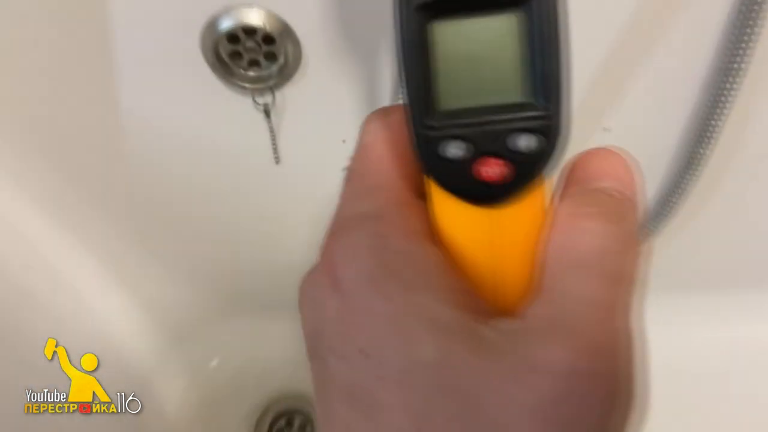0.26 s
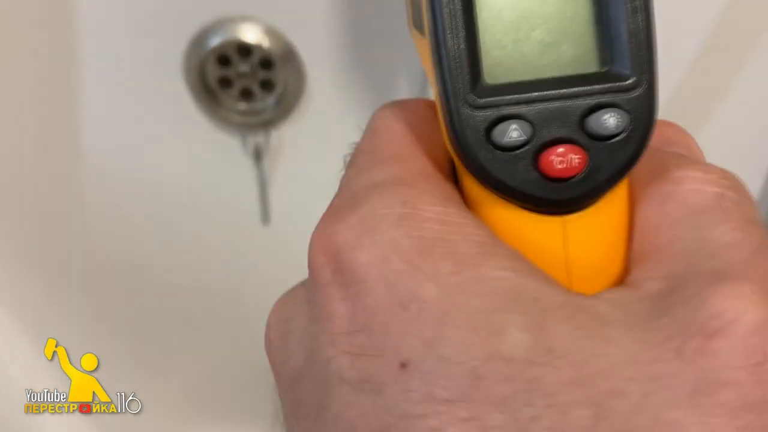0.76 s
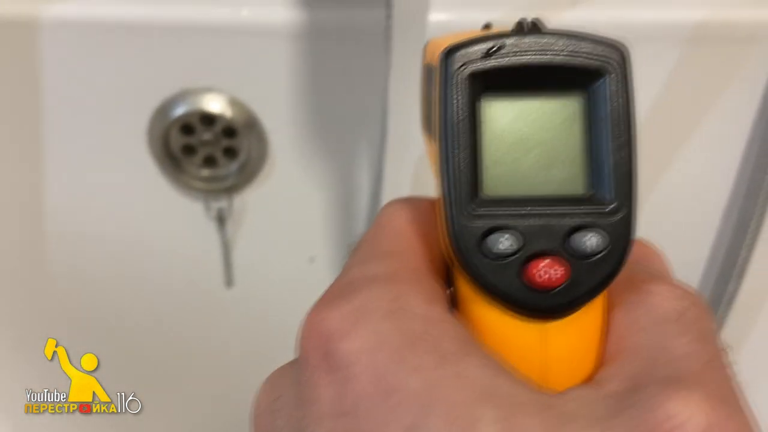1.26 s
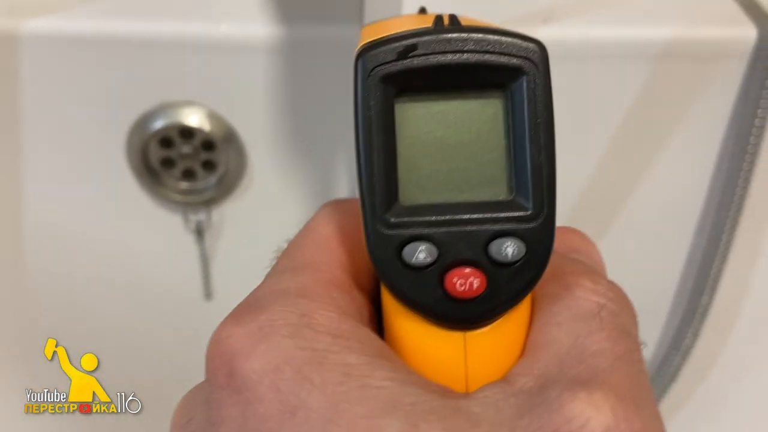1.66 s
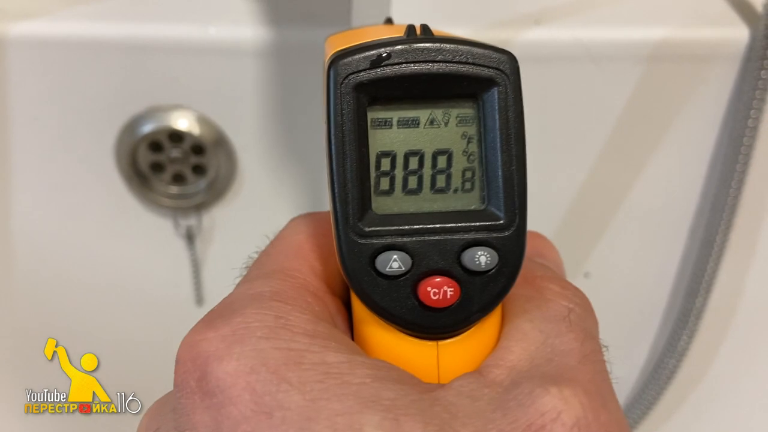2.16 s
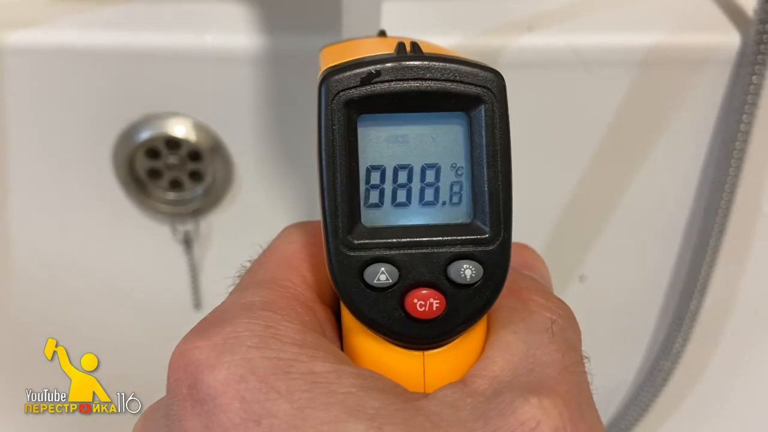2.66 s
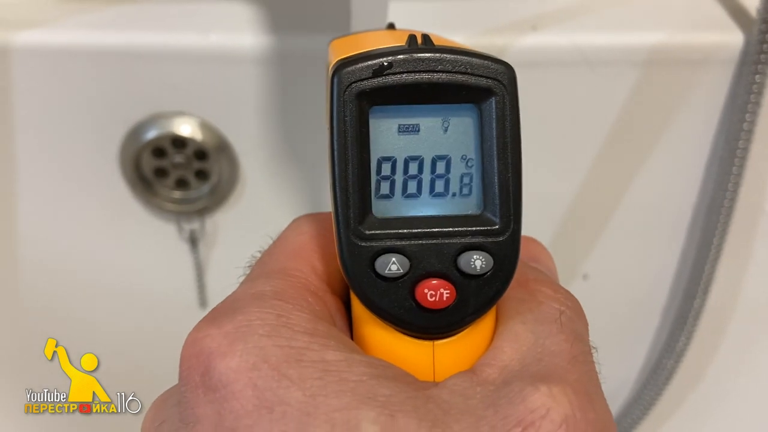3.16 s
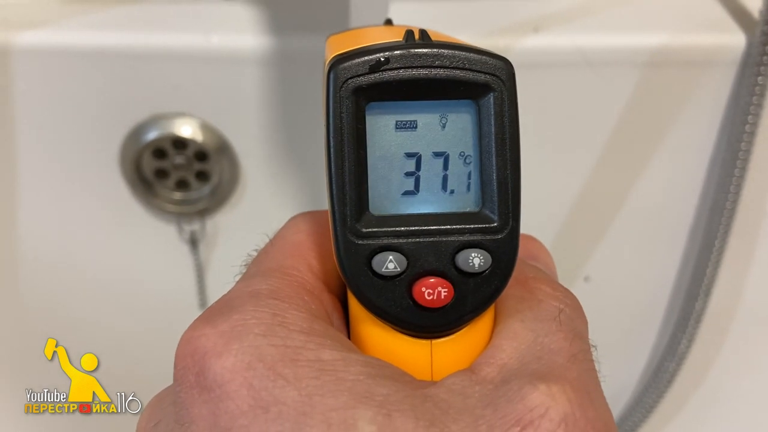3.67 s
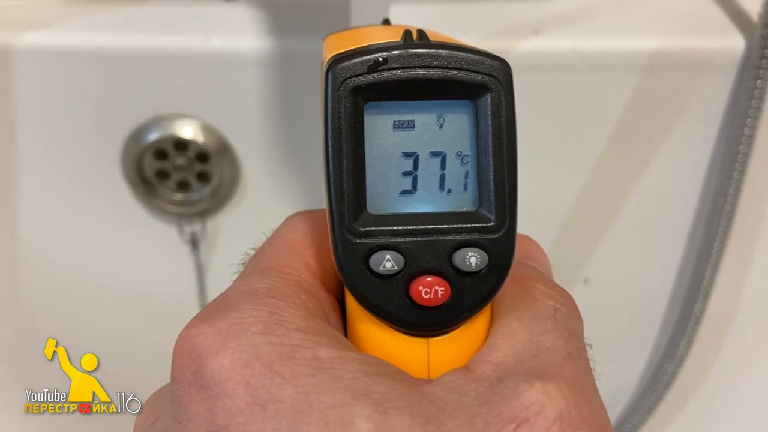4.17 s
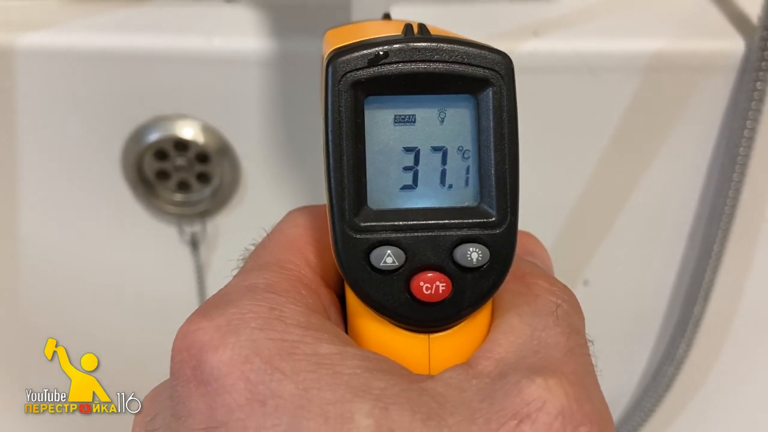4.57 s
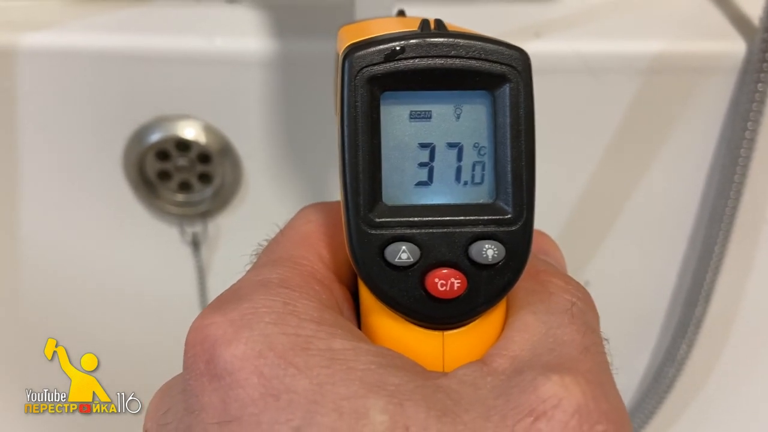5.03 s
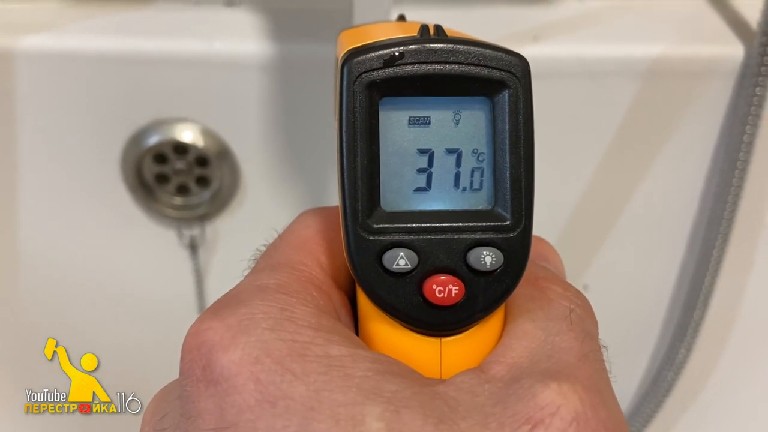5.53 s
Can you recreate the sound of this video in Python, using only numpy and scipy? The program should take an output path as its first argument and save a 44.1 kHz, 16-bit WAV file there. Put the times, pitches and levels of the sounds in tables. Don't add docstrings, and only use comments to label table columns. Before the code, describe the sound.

A tap runs steadily into a bathtub in a small tiled bathroom, hissing and splashing, with soft low thuds against the tub early on.

```python
import sys
import numpy as np
from scipy import signal
from scipy.fft import rfft, irfft
from scipy.io import wavfile

SR = 44100
rng = np.random.default_rng(int(sys.argv[2]) if len(sys.argv) > 2 else 0)


def pcm_store(signal):
    levels = np.round(np.clip(np.atleast_2d(signal), -1, 1) * 32767)
    wavfile.write(sys.argv[1], SR, levels.astype(np.int16).T)


def boost(x):
    u = np.asarray(x, float) / 20
    return 10 ** u


N = 255780


def rms_one(x):
    return x / np.sqrt(np.mean(x ** 2) + 1e-20)


def in_time(rows):
    s, *columns = np.transpose(rows)
    return [np.interp(np.arange(N) / SR, s, column) for column in columns]


def at_hz(points, hz):
    known_hz, level = np.array(points)[:, 0], np.array(points)[:, 1]
    return np.interp(np.log(hz + 1), np.log(known_hz + 1), level)


def drift(rate):
    r = np.exp(-16 * np.pi * rate / SR)
    noise = rng.standard_normal(N // 8 + 4002)
    slow = signal.lfilter([1], [1, -2 * r, r * r], noise)[4000:]
    return np.interp(np.arange(N) / 8, np.arange(len(slow)), rms_one(slow))


def ring(clicks, hz, t60):
    r = 10 ** (-3 / (t60 * SR))
    w = 2 * np.pi * hz / SR
    return signal.lfilter([0, np.sin(w)], [1, -2 * r * np.cos(w), r * r], clicks + 1e-18)


def causal(gain_db):
    cep = irfft(gain_db * np.log(10) / 20)
    half = len(cep) // 2
    return np.exp(rfft(np.r_[cep[0], 2 * cep[1:half], cep[half], np.zeros(half - 1)]))


def grains(per_s, spread_db):
    sizes = boost(spread_db * np.minimum(rng.exponential(1, N), 4)) * rng.choice([-1, 1], N)
    return sizes * (rng.random(N) < per_s / SR)


def lift(x, low_hz, high_hz, lift_db):
    band_pass = signal.butter(1, [low_hz, high_hz], "band", fs=SR, output="sos")
    band = signal.sosfiltfilt(band_pass, x)
    return x + (boost(lift_db - np.mean(lift_db)) - 1) * band


def stream():
    surge = boost(0.12 * drift(17.0) + .5 * drift(34) + 0.63 * drift(150))
    slaps = rms_one(grains(4000, spread_db=7.5))
    hiss = rng.standard_normal(N) + boost(-8.5) * slaps
    born, dealt = grains(3500, spread_db=3.5), rng.integers(0, 40, N)
    fizz = 0
    for k, hz in enumerate(np.geomspace(1500, 15000, 40)):
        swarm = boost(1.6 * drift(14))
        fizz = fizz + hz / SR * swarm * ring(born * (dealt == k), hz, 36.0 / hz)
    return rms_one(surge * (hiss + boost(-4.0) * rms_one(fizz))), surge


def water_colour(hz):
    # [f/Hz, level/dB]
    splash_curve = [(260, -24.5), (400, -20), (735, -18), (900, -15.5), (1280, -14), (1480, -19.5),
                    (2000, -10), (2600, -8.5), (3270, -3), (3950, -6), (4650, -1), (5500, -3), (6300, -1.5),
                    (8200, -4.5)]
    # [f/Hz, level/dB]
    top_curve = [(8200, -1.5), (9300, -3), (10000, -4), (12400, -5.5), (13000, -4), (14800, -6.5),
                 (15800, -13)]
    # [f/Hz, width/Hz, lift/dB]
    tub_peaks = [(680, 30, 5), (960, 40, 3), (1290, 97, 3), (1680, 25, 4), (2070, 30, 4), (2205, 30, 4),
                 (2340, 30, 3), (2500, 35, 5), (2722, 25, 6), (2930, 20, 4), (3138, 25, 7), (3340, 40, 3),
                 (3398, 22, 5), (3534, 27, 4), (4240, 50, 4), (4337, 30, 3), (4470, 60, 6.5), (4630, 40, 3),
                 (4783, 30, 5), (6135, 50, 4), (6478, 22, 4)]
    colour_db = at_hz(splash_curve, hz) + at_hz(top_curve, hz)
    colour_db = colour_db - 24 * np.log2(np.maximum(250 / (hz + 5), 1))
    for f, width, lift_db in tub_peaks:
        colour_db = colour_db + lift_db / (1 + (2 * (hz - f) / width) ** 2)
    return colour_db


def patchy(x, depth_db):
    edges = np.geomspace(700, 4000, 9)
    for low_hz, high_hz in zip(edges, edges[1:]):
        x = lift(x, low_hz, high_hz, depth_db * drift(11.2))
    return x


def tub_response(air_db):
    # [t/s, length/s, lift of the ring/dB]
    strays = [
        (2.805, 0.62, 7.5),
        (4.0, 0.35, 2.5),
        (4.496, 0.38, 3.5),
    ]
    t = np.arange(N) / SR
    air_db = air_db - np.mean(air_db)
    main_db = 0.92 * air_db + 0.1 * drift(6.2)
    main_db = main_db - 9 * np.exp(-t / .25)
    for s, length, lift_db in strays:
        main_db = main_db + lift_db * np.sin(np.pi * np.clip((t - s) / length, 0, 1))
    deep_db = -53.5 + 0.42 * air_db - 1 * drift(4)
    upper_db = -52 - 1 * t + 2 * drift(9.8)
    return main_db, deep_db, upper_db


def hum(deep_db, upper_db):
    # [f/Hz, width/Hz, level/dB]
    low_modes = [(57.5, 90, -29), (84.7, 21, 7), (98, 14, -2), (134, 56, -2), (180, 25, 2.5),
                 (198.8, 9.8, 0.5), (234.6, 16, -5)]
    shake = rng.standard_normal((3, N)) * boost(0.38 * drift(5.8))
    shake = boost(-8) * shake[1:] + shake[0]
    modes = [boost(db) * rms_one(ring(shake, hz, 2.9 / width)) for hz, width, db in low_modes]
    deep, upper = rms_one(sum(modes[:4])), rms_one(sum(modes[4:]))
    out = boost(deep_db) * deep + boost(upper_db) * upper
    return signal.sosfilt(signal.butter(4, [45, 290], "band", fs=SR, output="sos"), out)


def gurgles():
    # [t/s, length/s, f/Hz, level/dB]
    pockets = [
        (0.148, 0.091, 2530, -38),
        (0.183, 0.057, 3000, -37),
        (0.204, 0.089, 6500, -32),
        (0.308, 0.085, 3600, -34.5),
        (0.51, 0.12, 3320, -36),
        (2.696, .1, 2170, -43),
        (4.053, 0.13, 2080, -39.5),
        (5.233, 0.047, 2470, -31.5),
    ]
    out, t = np.zeros(N), np.arange(N) / SR
    shake = rng.standard_normal(N)
    for s, length, hz, db in pockets:
        swell = np.sin(np.pi * np.clip((t - s) / length, 0, 1))
        out += boost(db) * swell * rms_one(ring(shake, hz, 79.0 / hz))
    born, dealt = grains(42, spread_db=6.0), rng.integers(0, 10, N)
    for k, hz in enumerate(np.geomspace(1900, 4800, 10)):
        out += boost(-42 + 8.9 * np.log2(hz / 3000)) * ring(born * (dealt == k), hz, 8.5 / hz)
    return out


def drops():
    # [t/s, peak level/dB, bubble f/Hz]
    big_drops = [(0.165, -20, 2530), (0.7065, -8.5, 4660), (0.727, -13, 4880), (0.734, -10.5, 4770),
                 (0.8768, -12, 4830), (0.9106, -7, 5200), (0.9686, -13, 4800), (2.4333, -13.5, 3220),
                 (2.649, -13, 4470), (2.8734, -23, 4500), (2.8856, -12, 4500), (4.117, -12, 3170),
                 (4.632, -12, 4600), (4.7855, -12, 4600), (4.7934, -8.5, 4580), (4.8558, -14, 3350),
                 (5.0752, -24, 4680), (5.297, -10, 4870), (5.3698, -13, 4730)]
    out = np.zeros(N)
    for s, db, hz in big_drops:
        click = np.zeros(N)
        click[round(s * SR)] = boost(db - 1.5)
        bubble = ring(click, hz, 28 / hz)
        slap = ring(click, 11000, .0015)
        out += bubble + boost(-13) * slap
    return out


def thuds():
    # [t/s, level/dB, extra for the deepest mode/dB]
    pushes = [(0.243, -43, 10), (0.312, -42.5, 10), (0.628, -23.5, -5), (0.641, -33, 13), (0.651, -21, -8),
              (0.681, -23, 15), (0.779, -37.5, 4), (0.839, -42, 3), (0.875, -37, 22), (.905, -31, 10),
              (0.949, -34, 3)]
    # [f/Hz, level/dB, t60/s]
    shell_modes = [(43.5, -14.5, 0.24), (80.5, 2, 0.2), (98.3, -15.5, 0.51), (132, -35, 0.38),
                   (185, -15.5, 0.63)]
    out = np.zeros(N)
    at = [round(row[0] * SR) - 120 for row in pushes]
    for k, (hz, level_db, t60) in enumerate(shell_modes):
        push = np.zeros(N)
        push[at] = [-boost(db + level_db + deep_db * (k == 0)) for s, db, deep_db in pushes]
        out += ring(push, hz, t60)
    soft = signal.sosfilt(signal.butter(3, [36, 190], "band", fs=SR, output="sos"), out)
    knock = np.zeros(N)
    knock[round(.9 * SR)] = boost(-41)
    return soft + ring(knock, 400, 0.027)


def to_ports(source, smeared, colour_db, hz, size):
    # [f/Hz, lead/radians]
    shadow = [(0, 0), (1500, 0), (2000, .8), (2600, -.5), (4000, -.3), (5000, -1.1), (5500, -3.2),
              (6000, -3.8), (6500, -2 * np.pi)]
    # [f/Hz, level/dB]
    echo_curve = [(60, -3), (220, 3), (400, 1.5), (1200, 5.5), (2000, 4), (4500, -0.5), (6300, 7),
                  (7200, 11.5),
                  (8300, -10), (9100, -18), (10000, -11), (11150, -12.5), (12200, -11), (13300, -18),
                         (14500, -10), (16000, -12)]
    # [f/Hz, level/dB]
    left_curve = [(60, -2), (290, 0.5), (640, 0.5), (1000, 2), (1500, -2.5), (2300, -0.5), (3300, 1),
                  (5000, 0.5), (6300, -2.5), (7500, 0)]
    port_lag_s, in_step_hz = .000239, 6965
    room_t60_s, still = .3, .55
    lead = np.interp(hz, *np.transpose(shadow)) + 2 * np.pi * port_lag_s * np.maximum(hz - in_step_hz, 0)
    lag = np.exp(.5j * lead * np.array([[-1], [1]]))
    t = np.arange(SR // 2) / SR
    tail = rng.standard_normal((2, len(t))) * 10 ** (-3 * t / room_t60_s) * (t > .003)
    tail = rfft(tail / np.sqrt(np.sum(tail ** 2, axis=1, keepdims=True)), size)
    wet = boost(at_hz(echo_curve, hz))
    sides = boost(at_hz(left_curve + [(8300, 0)], hz) / 2 * np.array([[1], [-1]]))
    heard = rfft(source, size) * (lag + wet * np.sqrt(still) * tail)
    heard = heard + wet * np.sqrt(1 - still) * rfft(smeared, size)
    return irfft(heard * causal(colour_db) * sides / np.sqrt(1 + wet ** 2), size)[:, :N]


def scene():
    # [t/s, splash force/dB, air dragged under/dB]
    flow = [(0, -30, -9), (.3, -30.5, -7), (.52, -30, -3.5), (.7, -29, -6.5), (1.05, -29, -3.5),
            (1.35, -30, -4), (1.85, -30, -5), (2.4, -29.5, -4.5), (2.75, -30.5, -1.5), (3.05, -29, -7),
            (3.45, -29.5, -4.5), (4.08, -30, -1.5), (4.35, -30.5, -4), (4.7, -30, -3.5), (5.05, -30, -4),
            (5.3, -31, -2), (5.8, -29, -6)]
    splash_db, air_db = in_time(flow)
    size = 2 ** 19
    hz = np.arange(size // 2 + 1) * SR / size
    splash, surge = stream()
    smeared = rng.standard_normal((2, N)) * rms_one(surge ** 2.8)
    water = rms_one(to_ports(splash, smeared, water_colour(hz), hz, size)) * boost(splash_db + 5.5)
    main_db, deep_db, upper_db = tub_response(air_db)
    water = patchy(water, depth_db=1.36)
    water = lift(water, 2060, 4000, air_db)
    water = lift(water, 4400, 4570, main_db)
    water = lift(water, 4700, 6200, 4 * np.exp(-np.arange(N) / SR / .7))
    plop_colour_db = 3.5 - 12 * np.log2(np.maximum(1800 / (hz + 5), 1))
    plops = to_ports(drops() + gurgles(), np.zeros((2, N)), plop_colour_db, hz, size)
    thud_sides = boost(np.array([[-1.6], [1.6]]))
    return water + plops + hum(deep_db, upper_db) + thuds() * thud_sides


def top_cut(x):
    return signal.sosfilt(signal.butter(12, 16810, fs=SR, output="sos"), x)


def record(dry):
    cut = signal.sosfilt(signal.ellip(14, .5, 90, 15640, fs=SR, output="sos"), dry)
    return top_cut(cut)


dry = scene()
out = record(dry)
pcm_store(out)
```